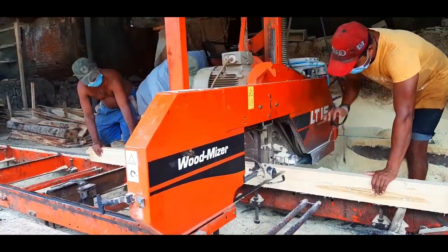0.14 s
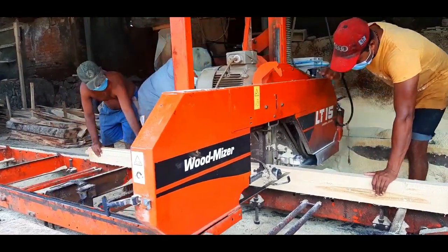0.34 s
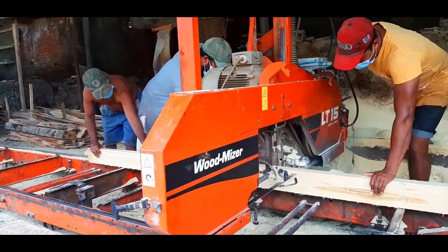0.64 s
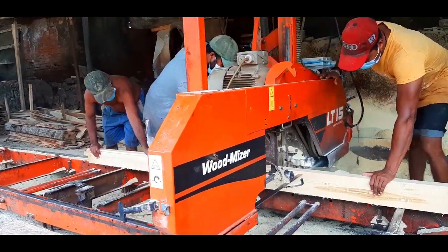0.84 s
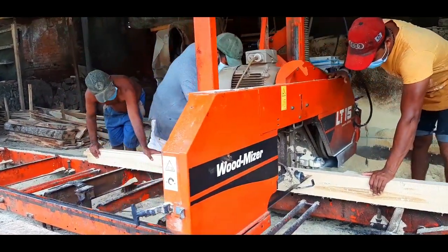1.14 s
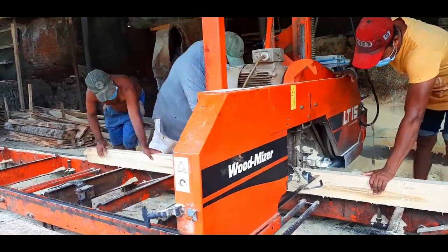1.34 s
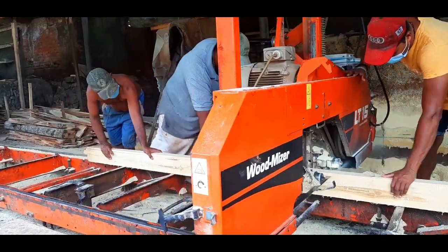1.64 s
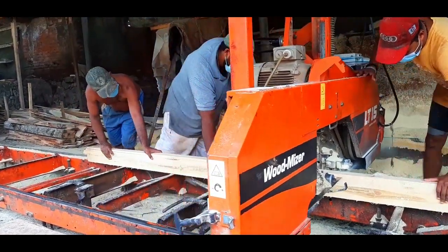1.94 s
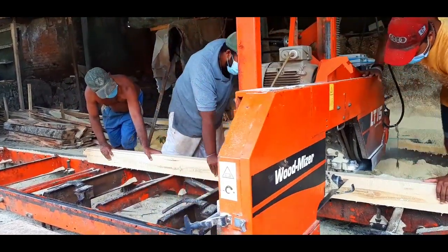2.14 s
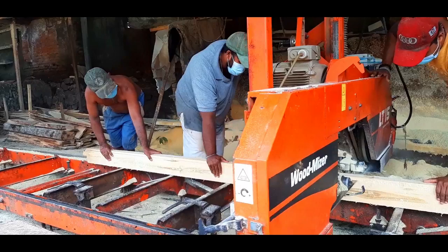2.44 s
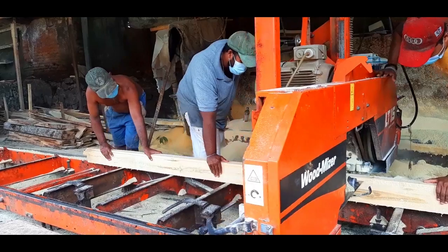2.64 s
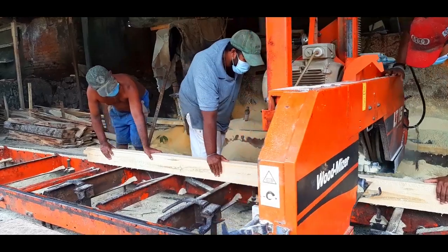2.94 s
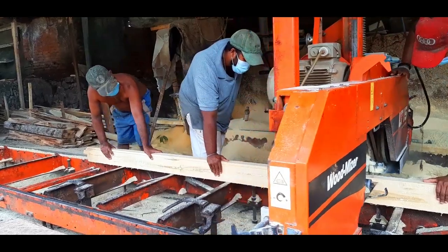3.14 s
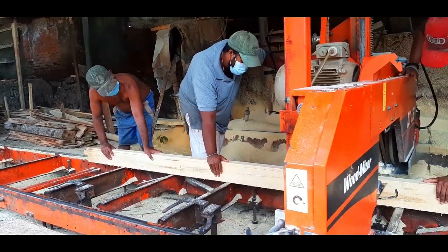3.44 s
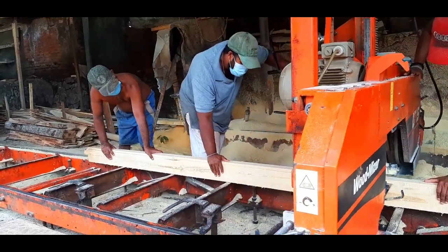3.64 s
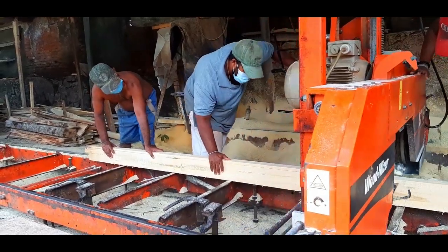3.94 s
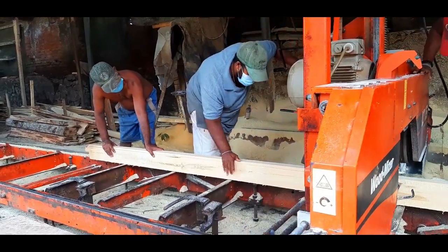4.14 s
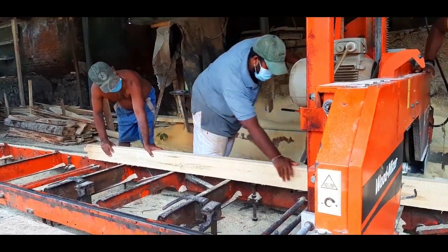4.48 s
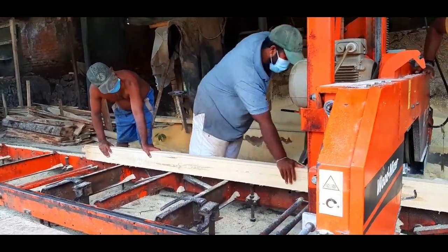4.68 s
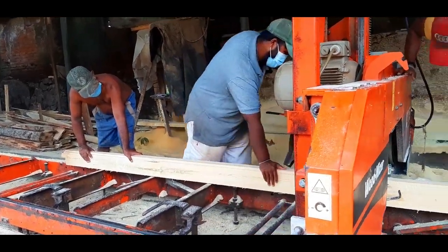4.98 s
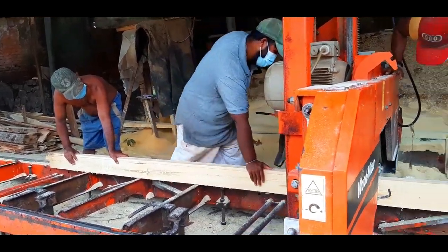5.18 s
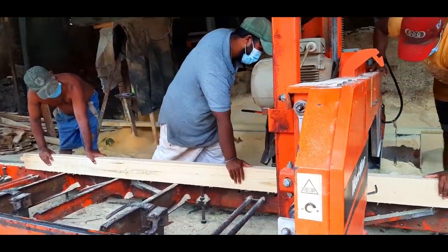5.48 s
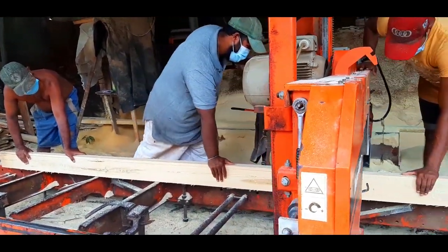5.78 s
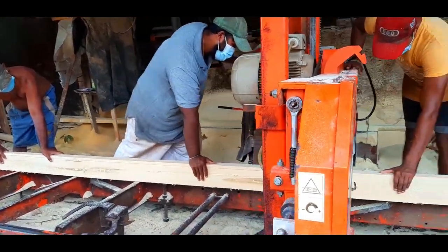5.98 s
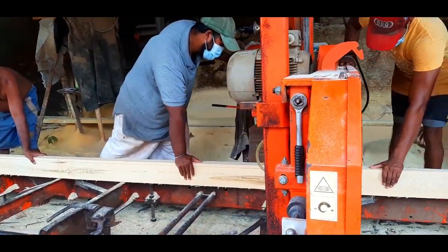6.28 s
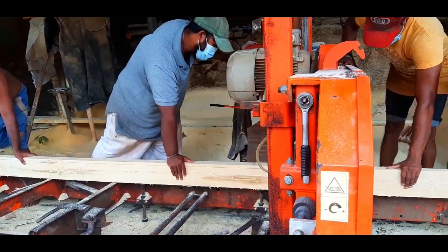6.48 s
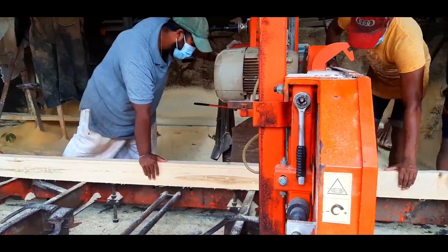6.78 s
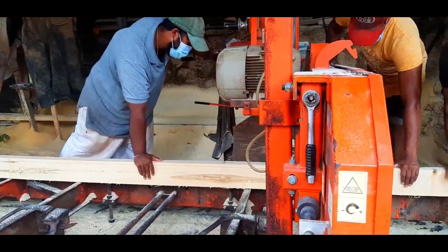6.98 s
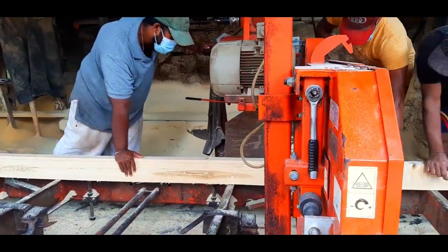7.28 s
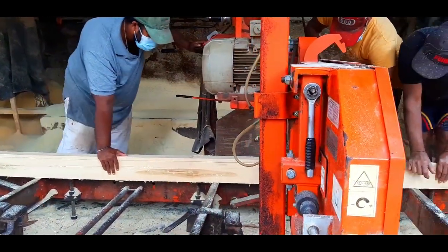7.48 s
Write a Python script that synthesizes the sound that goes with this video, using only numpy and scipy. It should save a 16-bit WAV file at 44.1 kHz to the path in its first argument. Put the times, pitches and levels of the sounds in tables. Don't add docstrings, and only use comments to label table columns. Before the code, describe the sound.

A portable band sawmill runs nonstop in an open-sided shed, heard from a handheld stereo microphone walking around it. A broad, airy motor and belt roar sits beneath a loud, bright blade hiss. A thin electric whine and its octave come and go, while a roller knocks so fast that it buzzes and makes the steel guard ring. Tones and hiss patches swell and fade; the roar sinks past the middle and returns nearest at the end.

```python
import sys
import numpy as np
from scipy import signal
from scipy.fft import rfft, irfft
from scipy.io import wavfile

SR = 44100
rng = np.random.default_rng(int(sys.argv[2]) if len(sys.argv) > 2 else 0)


def log_audio(samples):
    frames = np.atleast_2d(samples).T
    limited = np.clip(frames, -1, 1)
    pcm = np.round(limited * 32767).astype(np.int16)
    wavfile.write(sys.argv[1], SR, pcm)


def gain_from_decibels(decibels):
    exponent = np.asarray(decibels, float) / 20
    return 10 ** exponent


N = 336042
TIME = np.arange(N) / SR
SLOW_S = TIME[::64]
WINDOW, HOP = 2048, 512
HZ = np.fft.rfftfreq(WINDOW, 1 / SR)
FRAME_S = np.arange(N // HOP + 16) * HOP / SR


def evened(x):
    return x / np.sqrt(np.mean(abs(x) ** 2) + 1e-20)


def full(slow):
    return np.interp(TIME, SLOW_S, slow)


def read(points):
    f, value = np.transpose(points)
    return np.interp(np.log(HZ + 1), np.log(f + 1), value)[:, None]


def columns(rows, t):
    s, *rest = np.transpose(rows)
    return np.array([np.interp(t, s, column) for column in rest])


def smoothed(z, width, axis):
    at = np.fft.fftfreq(z.shape[axis])
    at = at[:, None] if axis == 0 else at
    blur = np.exp(-2 * (np.pi * width * at) ** 2)
    return np.fft.ifft(np.fft.fft(z, axis=axis) * blur, axis=axis)


def speckle(seconds=0., hz=0.):
    z = rng.standard_normal((len(FRAME_S), len(HZ), 2)) @ [1, 1j]
    if seconds:
        z = smoothed(z, seconds * SR / HOP, 0)
    if hz:
        z = smoothed(z, hz * WINDOW / SR, 1)
    return evened(z.T)


def spectra(x):
    padded = np.pad(evened(x), (0, 9216))
    return signal.stft(padded, nperseg=WINDOW, noverlap=WINDOW - HOP)[2][:, :len(FRAME_S)]


def sound(z):
    return signal.istft(z, nperseg=WINDOW, noverlap=WINDOW - HOP)[1][..., :N]


def drift(per_s, octaves=4):
    f, start = np.geomspace(per_s / 2 ** octaves, per_s, num=16), rng.random(16)
    coarse = np.sin(2 * np.pi * (f * FRAME_S[:, None] + start)) @ f ** -.5
    return np.interp(SLOW_S, FRAME_S, evened(coarse))


def spots(rows, rest_db, sharp):
    total = gain_from_decibels(rest_db)
    for s, rise, fall, db in rows:
        way = (SLOW_S - s) / np.where(SLOW_S < s, rise, fall)
        total = total + gain_from_decibels(db) * np.cos(np.pi / 2 * np.clip(way, -1, 1)) ** sharp
    return 20 * np.log10(total)


def even_spots(rows, rest_db, sharp):
    return spots([(s, half, half, db) for s, half, db in rows], rest_db, sharp)


def pair(turns, level_db, side_db):
    slip, angle = .9 * drift(2.5) - .15, 2 * np.pi * (turns % 1)
    sine = np.sin(angle)
    side = full(gain_from_decibels(side_db) * np.cos(slip)) * np.cos(angle)
    side -= full(gain_from_decibels(side_db) * np.sin(slip)) * sine
    return np.sqrt(2) * (full(gain_from_decibels(level_db)) * sine + side * [[1], [-1]])


# (t/s, level/dB)
ROAR_LEVEL = [(0.0, -38.5), (0.34, -42), (1.46, -40), (2.69, -41), (2.97, -40), (4.65, -44), (5.47, -41),
              (7.6, -37.5), (7.62, -37)]


def nearness():
    near_db = columns(ROAR_LEVEL, SLOW_S)[0]
    return near_db - np.mean(near_db)


# (f/Hz, level/dB per Hz)
ROAR_COLOUR = [(15, -54), (25, -21), (128, -14), (234, -1.5), (278, -4.5), (345, -0.5), (452, -0.5),
               (735, 0.5), (859, 0), (1240, -5), (1540, -2), (1660, 2), (2020, -1.5), (2600, -12),
               (3380, -78), (5720, -120)]
# (f/Hz, likeness)
LIKENESS = [(30, -1.2), (60, 1), (130, 1.12), (290, 0.89), (640, 0.77), (1410, 0.7), (3100, -1.72),
            (15000, -0.03)]
# (t/s, level/dB)
RUMBLE = [
    (0, -0.5),
    (2.6, 4),
    (3.9, 0.5),
    (5.9, -3.5),
    (7.62, -3),
]
# (f/Hz, width/Hz, level/dB)
FRAME_RINGS = [(223.5, 14, 1), (296, 3.9, -19), (339, 9.4, -5), (557, 21, -6.5)]


def roar():
    same, left = np.clip(read(LIKENESS), -1, 1), speckle()
    ports = np.array([left, same * left + np.sqrt(1 - same ** 2) * speckle()])
    level_db = columns(ROAR_LEVEL, FRAME_S)[0]
    bright_db = np.outer((0.46, .1), level_db)
    bright_db -= np.mean(bright_db, 1, keepdims=True)
    upper = np.clip(np.log2((HZ[:, None] + 1) / [700, 1400]), 0, 1) @ [[1.0, 0], [-0.46, 1]]
    ports *= gain_from_decibels(read(ROAR_COLOUR) + level_db + upper @ bright_db + 1.5 * speckle(0.19, 16).real)
    low = np.clip(np.log2(170 / (HZ[:, None] + 1)) * 2, 0, 1)
    ports *= gain_from_decibels(low * columns(RUMBLE, FRAME_S)[0])
    hz = np.fft.rfftfreq(N, 1 / SR)
    ringing = 1 + sum(gain_from_decibels(db) / (1 + (2 * (hz - f) / width) ** 2) for f, width, db in FRAME_RINGS)
    return gain_from_decibels(-38.0) * evened(irfft(rfft(sound(ports)) * ringing, N))


# (t/s, f/Hz)
SLOT_PITCH = [(0, 849), (.5, 848.5), (1.1, 846.3), (1.4, 845.5), (1.9, 847.7), (2.4, 846.8), (2.9, 848.2),
              (3.7, 848), (4.5, 849.5), (5, 847.6), (6.2, 847.4), (7.62, 846.5)]


def slot_turns():
    return np.cumsum(columns(SLOT_PITCH, TIME)[0] + 1.12 * full(drift(12))) / SR


# (peak t/s, rise t/s, fall t/s, level/dB)
WHINE = [(.08, 0.62, 0.57, -34.5), (.8, 0.31, 0.22, -51), (1.4, .15, 0.37, -49), (2.05, 0.42, 0.78, -35),
         (3.05, 0.096, 0.073, -44), (4.5, 0.87, 0.29, -47.5), (5.1, 0.5, 0.43, -38),
         (5.52, 0.39, 0.49, -36.5), (6.02, 0.043, 0.068, -37.5), (6.38, 0.39, 0.38, -34),
         (7.25, 1, 1, -43.5)]
# (peak t/s, rise t/s, fall t/s, level/dB)
WHINE_SIDE = [(.15, 0.37, 0.2, -48), (1.45, 0.4, 0.5, -50), (3.03, 0.15, 0.41, -43), (5.6, .4, 0.86, -50),
              (7.15, 0.57, .9, -41)]
# (peak t/s, rise t/s, fall t/s, level/dB)
OCTAVE = [(.1, 0.6, 0.34, -35.5), (.62, 0.17, 0.3, -42), (1.1, 0.27, 0.2, -31), (1.32, 0.092, .1, -36.5),
          (4.2, 0.37, 0.25, -52), (4.62, 0.17, .1, -47), (4.95, 0.25, 0.24, -45.5), (5.35, .15, .2, -52),
          (1.5, 0.065, 0.046, -43), (1.66, 0.13, 0.11, -35.5), (1.95, 0.3, 0.45, -34.5),
          (2.55, .14, 0.11, -40.5), (2.73, 0.16, 0.27, -34.5), (3.15, 0.12, 0.22, -38),
          (3.42, 0.15, 0.08, -42), (3.7, 0.43, 0.4, -43.5), (6.1, 0.3, 0.67, -43.5),
          (7.05, 0.38, 0.36, -34.5), (7.47, 0.25, 0.24, -36)]
# (peak t/s, rise t/s, fall t/s, level/dB)
OCTAVE_SIDE = [(0, 0.034, 0.17, -47), (.55, 0.2, 0.21, -42), (1.1, 0.3, 0.21, -38), (1.5, .15, 0.16, -43),
               (3.1, 0.27, 0.18, -46), (6.1, .3, .3, -51), (6.95, 0.62, 0.3, -34.5),
               (7.55, 0.13, 0.24, -41)]


def slot_whine(turns):
    whine_db = spots(WHINE, -73, sharp=1.08) + 0.95 * drift(40, octaves=2.2)
    whine_side_db = spots(WHINE_SIDE, -53.5, sharp=1.3) + 1.4 * drift(8)
    octave_db = spots(OCTAVE, -96, sharp=1.0) + 1.3 * drift(30, octaves=2)
    octave_side_db = spots(OCTAVE_SIDE, -47.5, sharp=1.4) + 2.9 * drift(12)
    return pair(turns, whine_db, whine_side_db) + pair(2 * turns, octave_db, octave_side_db)


# (tone cycles per shaft turn, level/dB)
SHAFT = [(31.5, -56.5), (36, -55.5), (102, -58.5), (136, -50.5)]
PASSING_SHAFT = (37.1, 41.2, 55.7, 64.9, 72.1, 79.6)
# (peak t/s, half length t/s, level/dB)
PASSING_SHAFT_SPOTS = [
    [(1.5, .8, -63), (3.1, .5, -62), (6, 0.75, -56)],
    [(4.1, 0.26, -54), (4.6, 0.52, -57), (5.8, .4, -55), (7.1, .5, -62)],
    [(2.7, 0.24, -52), (3.5, .4, -57), (5.8, 0.36, -56), (6.8, .5, -50), (7.4, .3, -52)],
    [(.2, .3, -61), (1.8, .3, -56.5), (2.7, 0.55, -50), (3.1, .2, -52), (5.75, .15, -54)],
    [(.2, .4, -55), (.9, .5, -58), (2.5, .35, -47.5), (3.1, 0.42, -53), (4.4, 0.7, -58), (7.1, 0.41, -45)],
    [(6.1, .3, -54), (6.6, .3, -55), (7.3, 0.41, -62)],
]


def shaft_tones(turns):
    shaft, near_db, out = turns / 34, nearness(), 0
    for order, db in SHAFT:
        fading_db = db + 1.3 * near_db + 1.9 * drift(3.1)
        out += pair(order * shaft, fading_db, fading_db - 12.5 + order / 6)
    for order, rows in zip(PASSING_SHAFT, PASSING_SHAFT_SPOTS):
        db = even_spots(rows, -66.5, sharp=1.0)
        out += pair(order * shaft, db + 2.5 * drift(19), db - 6.5)
    return out


# (f/Hz, start/turns, level/dB)
WHEELS = [(235.2, .09, -56), (239.16, 0, -54), (282.5, .3, -62), (314, .7, -61), (346.6, .5, -56)]


def wheel_tones():
    near_db, out = nearness(), 0
    for hz, start, db in WHEELS:
        turns = hz * TIME + start + .02 * full(drift(3))
        out += pair(turns, db + .9 * near_db + .8 * drift(3), db - 17)
    return out


# (peak t/s, rise t/s, fall t/s, level/dB)
IDLER = [
    (2.1, 1.9, 0.97, -50),
    (3.5, 0.56, .7, -53.5),
    (6.9, 1.6, 1.5, -59.5),
]


def idler_tone():
    db = spots(IDLER, -66.5, sharp=0.99)
    return pair(289.6 * TIME, db + 0.89 * drift(6.8), db - 24)


def motor():
    turns = slot_turns()
    return roar() + slot_whine(turns) + shaft_tones(turns) + wheel_tones() + idler_tone()


# (t/s, turns per s)
ROLLER_SPEED = [(0, 112.58), (.5, 112.5), (1.1, 112.28), (1.7, 112.37), (2.4, 112.22), (2.9, 112.42),
                (3.5, 112.58), (4.2, 113.04), (4.6, 112.95), (5, 112.33), (6.2, 112.3), (7.62, 112.18)]


def roller_turns():
    return np.cumsum(columns(ROLLER_SPEED, TIME)[0] * (1 + .0004 * full(drift(12)))) / SR


# (f/Hz, level/dB per Hz)
BLADE_COLOUR = [(590, -34), (1000, -25.5), (1300, -18.5), (1430, -19.5), (1530, -42), (1660, -23),
                (1780, -40), (2110, -15), (4470, -5), (4850, -7.5), (7340, -7), (8930, -13), (11500, -2.5),
                (14000, -2.5), (15700, -3.5)]
# (f/Hz, share)
KNOCK_SHARE = [(1000, .1), (2500, .05), (4000, .06), (6000, .1), (8000, .28), (14000, .15)]
# (f/Hz, share)
DIFFUSE = [(3000, .7), (8000, .5), (13000, .08)]
# (f/Hz, phase/radians)
SCATTER = [(3000, 3.28), (14000, 3.24)]
# (t/s, left lag behind right/samples, left minus right level/dB)
BEARING = [(0, 1, -1.7), (2, 3, -1.4), (3, 8, -2), (5.5, 5.5, -2.5), (6.5, -6.5, -1.5), (7.62, -12, -1.5)]
# (t/s, hiss level/dB)
BITE = [(0.0, -20.5), (0.08, -24.5), (1.23, -21.5), (1.84, -17), (2.67, -22), (3.56, -19), (3.97, -17),
        (5.01, -23), (5.3, -23.5), (5.43, -23), (5.54, -20.5), (5.73, -24.5), (5.75, -20.5), (6.58, -22),
        (6.6, -25.5), (7.62, -23)]
# (f/Hz, dB per dB of bite)
BITE_SHARE = [(2500, 0.13), (5500, -0.17), (8500, 0.31), (11500, 1), (14200, 0.29)]
# (t/s, half length t/s, f/Hz, half width/Hz, level/dB)
GLINTS = [(1.76, 0.77, 10370, 310, 4), (1.9, 0.38, 14800, 500, 7), (3.34, 0.28, 15400, 250, 5),
          (3.7, 0.17, 12000, 460, 5), (4.35, 0.47, 13600, 380, 8), (3.5, 0.54, 14200, 300, 4.5),
          (0.75, 0.42, 8000, 450, -4.5), (1.5, 0.33, 12000, 1200, 0.5), (3.04, 0.22, 15100, 600, 4),
          (4.47, 0.44, 11800, 290, 4), (5.252, 0.1, 14000, 200, 11.5), (6.4, 0.55, 14300, 230, 5),
          (6.05, 0.21, 12030, 202, 2), (6.7, 0.44, 12000, 203, 1), (4.933, 0.21, 8000, 570, -6),
          (.35, .25, 4700, 910, 2), (1.2, 0.28, 5100, 1200, -2.5), (2, 0.064, 3900, 900, 1.5),
          (2.3, 0.38, 4000, 1700, 2), (3.5, 1, 2680, 410, -3), (4.91, .15, 2800, 700, 3),
          (5.2, 0.84, 4400, 1220, -0.5), (6.58, 0.17, 5200, 1500, -3), (7.3, 0.63, 4000, 770, 0.5),
          (2.9, 0.49, 3000, 340, -1.5), (1.6, 0.49, 2700, 350, -0.5), (4.22, 0.094, 3300, 250, -12),
          (5, 0.14, 4300, 500, -2), (7.3, .15, 5800, 600, -2), (5.94, 0.17, 6800, 710, 2),
          (6.1, 0.37, 1900, 300, -4), (2.7, 0.11, 13000, 1800, -1.5), (6.55, 0.11, 8800, 1200, 1.5),
          (1.74, 0.14, 2900, 450, -1), (0.71, .13, 4600, 600, -1.5), (3.3, 0.32, 2600, 310, -1.5),
          (4.4, .25, 2900, 500, 1.5)]


def guide_and_blade(turns):
    knocks = spectra(np.diff(np.floor(turns), prepend=0) * gain_from_decibels(rng.standard_normal(N)))
    hiss = spectra(rng.standard_normal(N) * (1 + .7 * np.exp(-(turns % 1) / .2)))
    share, diffuse = np.clip(read(KNOCK_SHARE), 0, 1), np.clip(read(DIFFUSE), 0, 1)
    ringing = speckle(0.27, 60.0) + 0.3 * np.array([speckle(0.18, 21), speckle(0.21, 30)])
    lag, pan_db = columns(BEARING, FRAME_S)
    twist = np.pi * HZ[:, None] * lag / SR + read(SCATTER) / 2 * speckle(.13, 45).real
    straight = np.sqrt(share) * evened(knocks * ringing)
    straight = straight + np.sqrt((1 - share) * (1 - diffuse)) * evened(hiss)
    around = np.sqrt((1 - share) * diffuse) * np.array([speckle(), speckle()])
    ports = straight * np.exp([-1j * twist, 1j * twist]) + around
    bite_db = columns(BITE, FRAME_S)[0]
    swing_db = read(BITE_SHARE) * (bite_db - np.mean(bite_db))
    patches_db = 1.2 * speckle(.12, 300).real
    patches_db += 1.3 * speckle(.015, 350).real
    for s, length, hz, width, db in GLINTS:
        distance = ((FRAME_S - s) / length) ** 2 + ((HZ[:, None] - hz) / width) ** 2
        patches_db += db * np.exp(-distance / 2)
    sides_db = pan_db / 2 * np.array([1, -1])[:, None, None]
    ports *= gain_from_decibels(read(BLADE_COLOUR) + swing_db + patches_db + sides_db)
    return gain_from_decibels(-16.0 + .5 * full(drift(60, octaves=2))) * evened(sound(ports))


def beating_overtone(turns):
    return pair(15 * turns, -50 + 0.94 * drift(1.9), -48.0)


GUARD_ORDERS = (10, 13, 15, 20, 24, 29, 32, 36, 40, 41, 45, 50, 17, 18, 21, 25, 31, 34, 35, 37, 38, 43, 44,
                46, 47, 52, 7, 16.645, 5, 23, 42, 54)
# (peak t/s, half length t/s, level/dB)
GUARD_SPOTS = [
    [(.1, 0.52, -49.5), (1.47, .3, -46), (3.7, 0.97, -52), (6.74, 0.22, -57)],
    [(.75, 0.53, -45), (1.76, 0.18, -45), (4.9, 0.72, -54), (7.3, 0.89, -48.5)],
    [(4.8, 0.42, -53), (6.3, 0.24, -45), (7.2, 0.65, -40.5)],
    [(4.598, 1, -50.5)],
    [(1.2, 0.35, -49), (1.76, 0.3, -44), (3.9, .35, -46), (4.45, .35, -45), (4.95, 0.3, -43),
     (5.3, .15, -46)],
    [(1, 0.24, -51), (2.04, 0.11, -35.5), (2.4, 0.33, -45), (3.3, 0.24, -48), (4.7, .4, -49),
     (5.55, 0.18, -41.5), (6.5, 0.77, -49)],
    [(.55, 0.34, -43), (2.25, 0.64, -44), (3.55, 0.24, -40.5), (4.7, 0.18, -41), (5.55, .3, -53),
     (7.2, 0.84, -41)],
    [(.1, .22, -40), (.5, .2, -39), (2, .1, -39), (2.4, .4, -46), (6.3, .2, -45)],
    [(2.35, .2, -41), (2.7, .32, -31), (2.98, .2, -38), (3.25, .36, -32), (3.6, .2, -43), (6.05, .25, -40)],
    [(.4, .35, -42), (3.42, 0.19, -34), (6.15, 0.21, -50)],
    [(1.65, 0.36, -55), (2.75, 0.35, -37), (3.3, .3, -39), (4.05, 0.22, -43), (4.7, 0.25, -40.5),
     (5.85, 0.21, -46)],
    [(2.7, 0.31, -37), (3.45, 0.3, -41), (4.05, .2, -41), (4.7, 0.21, -39), (7.1, 0.62, -41)],
]
# (peak t/s, half length t/s, level/dB)
MORE_GUARD_SPOTS = [
    [(.1, .25, -59), (3.7, 0.42, -57), (6.6, 0.66, -48.5)],
    [(3.9, 0.56, -48), (4.4, 0.23, -57)],
    [(6.15, 0.3, -45), (6.75, 0.46, -50)],
    [(.15, 0.38, -45), (4.6, 1, -46.5)],
    [(.45, .25, -43), (5.25, 0.77, -45), (7, 0.99, -46)],
    [(4.8, 0.75, -43.5), (6.45, 0.63, -46)],
    [(.25, 0.67, -40), (1.85, 0.48, -45)],
    [(5.653, 0.65, -39.5)],
    [(.45, 0.24, -44), (5.25, .2, -51), (6.1, .35, -42)],
    [(.75, .3, -40), (2.6, 0.83, -52), (5.55, 0.96, -42), (7.4, .4, -39)],
    [(.4, 0.22, -37), (1.6, 0.59, -41.5), (4.35, 0.46, -41)],
    [(3.3, 0.5, -43)],
    [(.45, 0.16, -34.5), (1.95, 0.2, -49), (4, 0.53, -44), (5.25, 0.24, -40)],
    [(.1, .3, -39), (5.25, 0.19, -39)],
    [(5.6, 1.1, -54)],
    [(5.6, .15, -54), (6.6, .4, -50), (7.45, 0.56, -43)],
    [(5.5, .4, -49.5), (6.2, 0.45, -51.5), (7.3, .5, -53)],
    [(3.8, 0.25, -55), (5.8, 0.31, -57), (7.2, .4, -56)],
    [(3.1, 0.34, -41), (7.1, .3, -44.5)],
    [(2.9, .2, -45), (6.2, .25, -44), (7.4, .3, -46)],
]


def guard_tones(turns):
    out = 0
    for order, rows in zip(GUARD_ORDERS, GUARD_SPOTS + MORE_GUARD_SPOTS):
        db = even_spots(rows, -60, sharp=0.93)
        out += pair(order * turns + rng.random(), db - 1.5 + 2.2 * drift(45, octaves=2.5), db - 6)
    return out


def blade():
    turns = roller_turns()
    return guide_and_blade(turns) + beating_overtone(turns) + guard_tones(turns)


def scene():
    return motor() + blade()


def band_limit(x):
    return signal.sosfilt(signal.butter(12, 17070, fs=SR, output="sos"), x)


def record(dry):
    low_pass = signal.firwin(2047, 15730, window=("kaiser", 9), fs=SR)
    mix = signal.oaconvolve(dry, low_pass[None], "same")
    return band_limit(mix)


dry = scene()
out = record(dry)
log_audio(out)
```